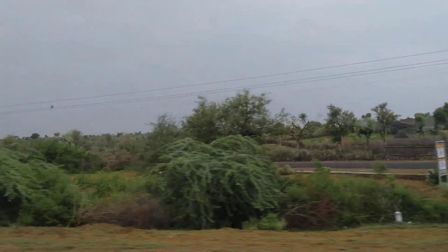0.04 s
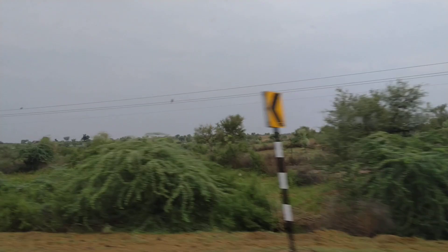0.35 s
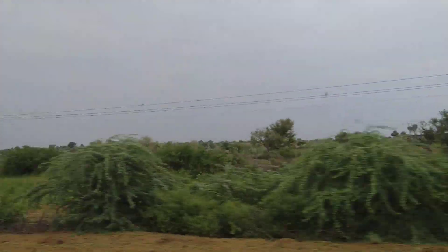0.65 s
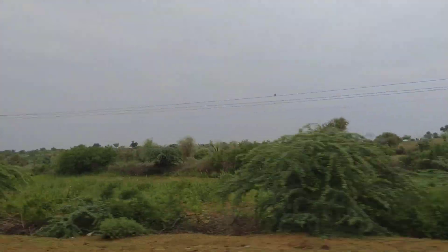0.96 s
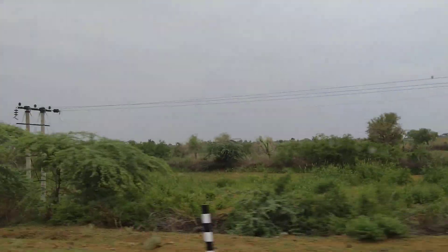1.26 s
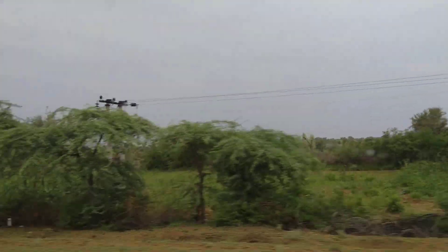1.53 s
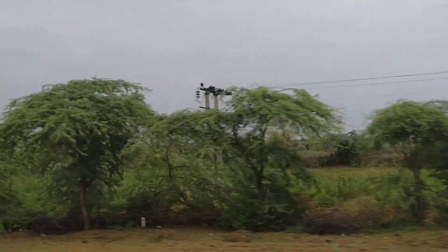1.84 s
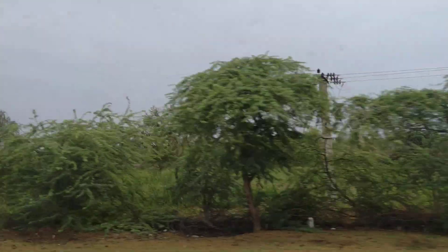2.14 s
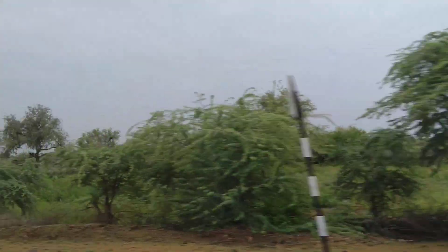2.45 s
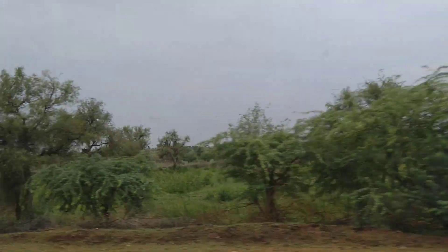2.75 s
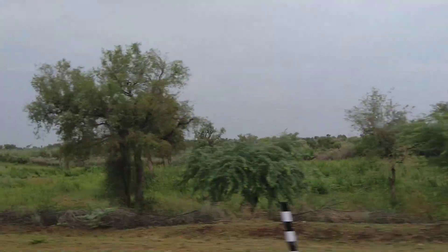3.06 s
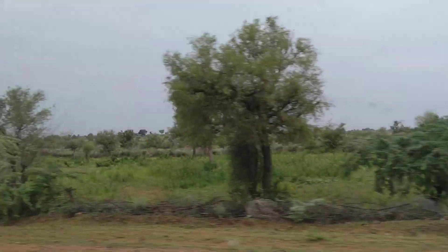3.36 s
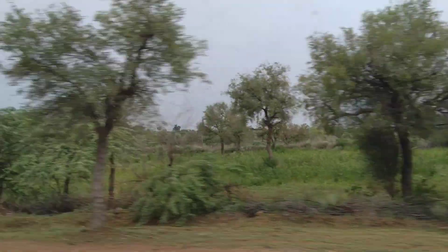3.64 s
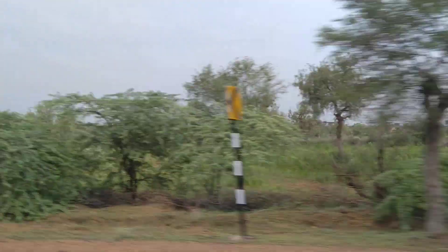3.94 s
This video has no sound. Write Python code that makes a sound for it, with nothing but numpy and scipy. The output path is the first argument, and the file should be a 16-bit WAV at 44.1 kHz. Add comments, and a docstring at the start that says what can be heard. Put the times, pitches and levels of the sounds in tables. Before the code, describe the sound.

A vehicle cruising, heard from inside: low road rumble, engine hum and light rattling.

```python
"""Inside a vehicle cruising at steady speed along a country road. From the start the engine drones,
the wheels add low harmonics, the rough road rumbles through the body, and tyre roar and wind hiss
enter at the side window. Within the first 0.3 s the tread sings twice. Loose trim then rattles faintly
by impact and squeaks and creaks by stick-slip friction, thins out after 2 s and is busy again from
about 3 s, while the drone carries on to the end."""
import sys
import numpy as np
from scipy import signal
from scipy.fft import rfft, irfft, next_fast_len
from scipy.io import wavfile
from scipy.ndimage import uniform_filter1d, map_coordinates

SR = 44100
rng = np.random.default_rng(int(sys.argv[2]) if len(sys.argv) > 2 else 0)


def generate_wav(sig):
    """Save sig (samples, or channels by samples) to the path in sys.argv[1] as 16-bit PCM at SR."""
    pcm = np.round(np.clip(np.atleast_2d(sig).T, -1, 1) * 32767).astype(np.int16)
    wavfile.write(sys.argv[1], SR, pcm)


N = 176400

CRANK_HZ, WHEEL_HZ = 20.14, 16.85  # fundamentals of the two harmonic series
# harmonics of the crankshaft and of the wheels (multiple [1], level [dB])
ENGINE_HARMONICS = [(1, -29), (2, -20.5), (3, -30), (5, -21.5), (6, -33.5), (10, -33.5), (12, -39.5),
                    (14, -46), (18, -50.5), (24, -48.5)]
WHEEL_HARMONICS = [(4, -33.5), (5, -31), (9, -35), (10, -34), (11, -32), (13, -45.5), (20, -48.5),
                   (27, -52)]
# envelopes of firing throb, cabin boom, road rumble and tyre roar (time [s], relative level [dB])
THROB_ENVELOPE = [(.36, -22), (.43, -10.5), (.54, -22), (.6, -18), (.77, -18.5), (.85, -26), (1.28, -31),
                  (1.49, -15), (1.8, -18), (2.2, -25), (2.3, -22.5), (2.77, -17), (3.0, -26), (3.21, -17.5),
                  (3.65, -20), (4, -19)]
BOOM_ENVELOPE = [(.09, -22), (.19, -16), (.42, -17), (.5, -34), (.63, -20), (1.24, -24), (1.41, -14),
                 (1.54, -27), (1.92, -19), (2.21, -26), (2.28, -19.5), (2.52, -16), (2.73, -29),
                 (3.08, -12), (3.13, -28.5), (3.45, -20), (3.61, -15.5), (3.72, -22)]
RUMBLE_ENVELOPE = [(0, -20), (.55, -25.5), (.78, -20), (1.2, -26.5), (1.52, -19.5), (1.9, -21.5),
                   (2.15, -25.5), (2.68, -21.5), (4, -24)]
ROAR_ENVELOPE = [(0, -33.5), (1.1, -33.5), (1.9, -33), (2.1, -33), (3.1, -33.5), (3.5, -32.5)]
# gust strength, which drives the rush of the wind by a power law (time [s], relative level [dB])
GUST_STRENGTH = [(0.05, -53), (0.75, -50), (1.6, -51), (2.42, -53), (2.67, -49.5), (3.1, -53), (3.36, -49),
                 (3.73, -55), (4, -52.5)]
# noise spectra; SIDE is the part that differs between the ears (frequency [Hz], relative density [dB])
RUMBLE_SPECTRUM = [(22, -33), (35, 3), (75, 0.5), (120, 0.5), (150, -10.5), (220, -8.5), (255, -13.5),
                   (275, -16), (320, -25.5), (500, -78)]
ROAR_SPECTRUM = [(150, -43), (250, -10.5), (300, 0), (490, -1.5), (560, -4), (680, -8), (735, -5),
                 (860, -12), (1000, -11.5), (1350, -14.5), (1550, -28), (2500, -79)]
ROAR_SIDE_SPECTRUM = [(60, -20), (100, 2.5), (150, 0.5), (290, -1), (400, 0), (490, 5.5), (600, -1),
                      (830, -1.5), (1000, -5), (1400, -5.5), (1800, -8.5), (2600, -39)]
HISS_SPECTRUM = [(700, -47), (1600, 0.5), (2100, 1.5), (3200, -0.5), (4100, -3.5), (4450, -8), (4650, -0.5),
                 (5650, 0), (5900, -6.5), (6800, -7), (7150, -12.5), (9500, -15.5), (12900, -10.5),
                 (13500, -17), (13800, -22), (16000, -29.5)]
HISS_SIDE_SPECTRUM = [(700, -42), (1600, -8), (2400, 5), (2750, -4), (3200, 4), (4200, -2), (4800, -2),
                      (5600, -6.5), (6700, -7), (7200, -20), (9500, -17.5), (12900, -13), (13500, -21),
                      (13800, -30), (16000, -42)]
RUSH_SPECTRUM = [(1000, -37), (1700, -1.5), (2150, 3.5), (2800, -1.5), (3500, -5), (4400, -24)]
RATTLE_SPECTRUM = [(800, -28), (2000, 1), (3800, 4), (5700, 2.5), (7500, -4), (10000, -6), (13000, -4),
                   (15500, -14)]
CREAK_SPECTRUM = [(2400, -35), (3100, 0), (4200, 0), (5000, -18), (7000, -50)]
# interaural phase of the tyre roar (frequency [Hz], lead of the left ear [rad])
ROAR_PHASE = [(700, -0.33), (900, -1.9), (1050, -0.3), (1350, -1.76), (1600, 0.071)]
# interaural level difference of the wind (frequency [Hz], left minus right [dB])
WIND_BALANCE = [(2900, 0.5), (3300, 1.5), (5000, -1.5), (6400, 2.5), (7500, -4), (9800, -3), (11000, -2.5),
                (12600, 5.5), (14000, -2)]
# brief tones of the tread and of rubbing trim (centre time [s], frequency [Hz], nominal level [dB])
TREAD_TONES = [(.2, 733, -41), (.27, 480, -40)]
TRIM_SQUEAKS = [(.612, 4150, -53), (.70, 4200, -57), (0.757, 4250, -48), (0.785, 4300, -48),
                (.83, 4330, -57), (0.893, 4120, -54), (1.537, 4100, -56), (3.066, 4080, -45),
                (3.14, 4020, -52), (3.206, 4110, -42.5), (3.282, 4090, -45), (3.575, 3290, -45),
                (3.92, 4280, -52)]
# jolts of loose trim (onset time [s], nominal level [dB])
TRIM_JOLTS = [(.372, -46), (.41, -58), (.612, -46), (.632, -57), (.752, -47), (.826, -50), (.885, -43.5),
              (.925, -54), (.985, -47), (1.179, -48), (1.33, -51), (1.467, -48), (1.612, -48), (1.747, -46),
              (1.895, -44), (1.93, -52), (2.403, -49), (2.468, -48), (2.912, -49), (3.05, -47),
              (3.132, -49), (3.198, -47), (3.277, -45), (3.35, -49), (3.41, -50), (3.487, -45.5),
              (3.567, -44), (3.642, -47), (3.916, -47)]
# spells of creaking (centre time [s], nominal level [dB], half-width [s])
CREAK_SPELLS = [(.78, -66, 0.093), (1.347, -53, .2), (3.353, -59, 0.19)]

RUMBLE_DB, ROAR_DB, ROAR_SIDE_DB = -20.5, -34, -41
HISS_DB, HISS_SIDE_DB, RUSH_DB, CHATTER_DB = -51, -48, -54.5, -64.5


def engine():
    """Periodic forcing: four cylinders fire twice a turn, and the fifth harmonic booms in the cabin."""
    envelopes = {2: envelope(THROB_ENVELOPE), 5: envelope(BOOM_ENVELOPE)}
    tones = harmonics(ENGINE_HARMONICS, CRANK_HZ, drift=0.0013, flutter_db=0.6, flutter_rate=8)
    return sum(tone * envelopes.get(round(k), 1) for (k, _), tone in zip(ENGINE_HARMONICS, tones))


def wheels_and_road():
    """Forced vibration: rotation gives harmonics, road roughness a rumble, alike at both ears."""
    tones = harmonics(WHEEL_HARMONICS, WHEEL_HZ, drift=0.002, flutter_db=2.0, flutter_rate=6.7)
    rumble = amp(RUMBLE_DB) * envelope(RUMBLE_ENVELOPE) * noise(RUMBLE_SPECTRUM, patchy_db=0.86)
    return sum(tones) + rumble


def tyre_roar():
    """Rolling noise with an interaural phase difference: its upper range reaches the right ear first."""
    mid = amp(ROAR_DB) * noise(ROAR_SPECTRUM, patchy_db=1.34)
    side = amp(ROAR_SIDE_DB) * noise(ROAR_SIDE_SPECTRUM, patchy_db=0.1)
    roar = filtered(ears(mid, side), lambda hz: np.exp(np.outer([.5j, -.5j], along(ROAR_PHASE, hz))))
    return envelope(ROAR_ENVELOPE) * roar


def wind():
    """Flow noise at the window: a high hiss and a lower, gusting rush flicker together."""
    mid = amp(HISS_DB) * noise(HISS_SPECTRUM, patchy_db=0.94)
    side = amp(HISS_SIDE_DB) * noise(HISS_SIDE_SPECTRUM, patchy_db=1.5)
    gusts = unit(envelope(GUST_STRENGTH) ** 2.1)
    rush = amp(RUSH_DB) * gusts * noise(RUSH_SPECTRUM, patchy_db=1.55)
    flicker = amp(0.63 * wobble(24.9))
    air = flicker * (ears(mid, side) + rush)
    return filtered(air, lambda hz: amp(np.outer([.5, -.5], along(WIND_BALANCE, hz))))


def tread_singing(half_width_s=0.05, waver_hz=4.4):
    """Tonal radiation: on some patches of road the tread sings under a Gaussian envelope."""
    t, out = np.arange(N) / SR, np.zeros(N)
    waver = np.cumsum(waver_hz * wobble(40)) / SR
    for centre, hz, db in TREAD_TONES:
        tone = np.sqrt(2) * np.sin(2 * np.pi * (hz * t + waver))
        out += amp(db) * gaussian(t - centre, half_width_s) * tone
    return out


def trim_rattles(rise_s=0.0046, decay_s=0.024):
    """Incoherent impacts: each jolt's burst of tiny contacts adds in power to a faint chatter."""
    t = np.arange(N) / SR
    chatter = amp(CHATTER_DB) * unit(amp(7.3 * np.tanh(wobble(30))))
    power = chatter ** 2
    for onset, db in TRIM_JOLTS:
        age = np.maximum(t - onset, 0)
        burst = amp(db) * np.minimum(age / rise_s, 1) * np.exp(-age / decay_s)
        power += burst ** 2
    contacts = rng.standard_normal((2, N)) * amp(2.3 * wobble(1500))
    return np.sqrt(power) * coloured(contacts, RATTLE_SPECTRUM)


def trim_squeaks(half_width_s=0.017, waver_hz=55.3, left_lead_rad=2.5, right_excess_db=1.5):
    """Stick-slip oscillation: trim gives brief, rough chirps, a little louder on the right."""
    t, out = np.arange(N) / SR, np.zeros((2, N))
    waver = np.cumsum(waver_hz * wobble(500)) / SR
    grain = unit(amp(3 * np.tanh(wobble(220))))
    ear_phase = np.array([[left_lead_rad], [0]])
    ear_gain = amp(right_excess_db * np.array([[-.5], [.5]]))
    for centre, hz, db in TRIM_SQUEAKS:
        near = abs(t - centre) < 2 * half_width_s
        swell = grain[near] * gaussian(t[near] - centre, half_width_s)
        tone = np.sqrt(2) * np.sin(2 * np.pi * (hz * t[near] + waver[near]) + ear_phase)
        out[:, near] += amp(db) * ear_gain * swell * tone
    return out


def trim_creaks():
    """Irregular stick-slip friction: trim rubs in spells of grainy slips of bounded strength."""
    t = np.arange(N) / SR
    spells = sum(amp(db) * gaussian(t - centre, half_width) for centre, db, half_width in CREAK_SPELLS)
    grain = amp(9.3 * np.tanh(wobble(70)) + 4 * np.tanh(wobble(450)))
    slips = grain * rng.standard_normal((2, N))
    return spells * coloured(slips, CREAK_SPECTRUM)


def harmonics(table, hz, drift, flutter_db, flutter_rate):
    """Harmonic series of a slightly drifting rotation, each tone fluttering in level."""
    angle = 2 * np.pi * np.cumsum(hz * (1 + drift * wobble(1.963))) / SR
    tones = []
    for multiple, db in table:
        tone = np.sin(round(multiple) * angle + 2 * np.pi * rng.random())
        flutter = amp(flutter_db * wobble(flutter_rate))
        tones.append(amp(db) * unit(tone * flutter))
    return tones


def noise(spectrum, patchy_db):
    """Coloured noise of rms 1, modulated in random patches of time and frequency."""
    bins = signal.stft(rng.standard_normal(N), nperseg=512)[2]
    patches = uniform_filter1d(rng.standard_normal(bins.shape), size=6, axis=0)
    patches = uniform_filter1d(patches, size=20, axis=1)
    patchy = signal.istft(bins * amp(patchy_db * unit(patches)), nperseg=512)[1][:N]
    return coloured(patchy, spectrum)


def coloured(x, spectrum):
    """Spectral shaping of x, scaled to rms 1."""
    return unit(filtered(x, lambda hz: amp(along(spectrum, hz))))


def filtered(x, response):
    """Linear filtering: the spectrum of x times a frequency response."""
    size = next_fast_len(N + SR // 2)
    return irfft(rfft(x, size) * response(np.fft.rfftfreq(size, 1 / SR)), size)[..., :N]


def ears(mid, side):
    """Sum and difference give the left and right signals."""
    return np.array([mid + side, mid - side])


def envelope(points):
    """Amplitude envelope of rms 1 from (time [s], level [dB]) points."""
    times, db = np.transpose(points)
    return unit(amp(np.interp(np.arange(N) / SR, times, db)))


def gaussian(offset, half_width):
    """Gaussian pulse, falling from 1 to exp(-2) at the half-width."""
    return np.exp(-2 * (offset / half_width) ** 2)


def wobble(rate):
    """Smooth random modulation with rate knots a second."""
    return map_coordinates(rng.standard_normal(4096), [np.arange(N) * rate / SR + 2], mode="wrap")


def along(points, hz):
    """Interpolation on a logarithmic frequency axis."""
    frequencies, values = np.transpose(points)
    return np.interp(np.log(hz + 1), np.log(frequencies + 1), values)


def amp(db):
    """Decibels to amplitude ratio."""
    return 10 ** (np.asarray(db) / 20)


def unit(x):
    """Normalisation to rms 1."""
    return x / np.sqrt(np.mean(x ** 2) + 1e-20)


def scene():
    """Superposition of all sources at the seat by the window."""
    driving = engine() + wheels_and_road() + tyre_roar() + wind() + tread_singing()
    return driving + trim_rattles() + trim_squeaks() + trim_creaks()


def record(dry, cutoff_hz=15750):
    """Band limiting: an ideal low-pass filter passes nothing above the cutoff."""
    return filtered(dry, lambda hz: hz < cutoff_hz)


dry = scene()
out = record(dry)
generate_wav(out)
```